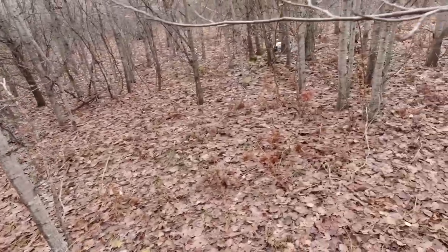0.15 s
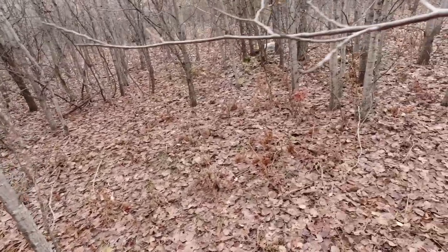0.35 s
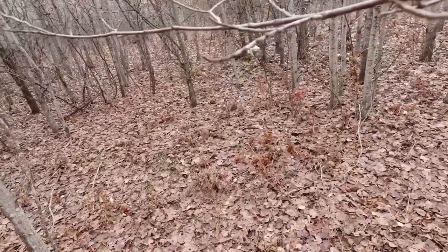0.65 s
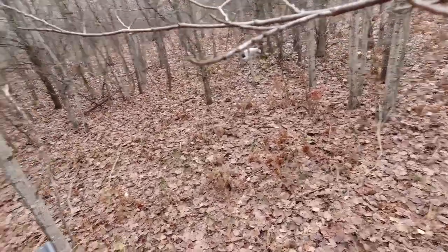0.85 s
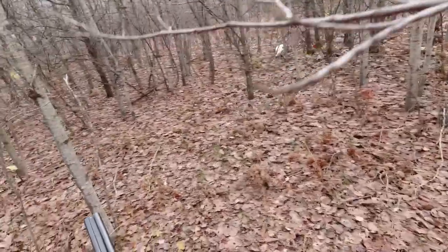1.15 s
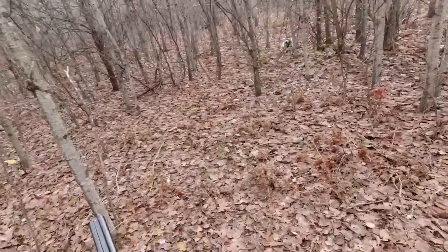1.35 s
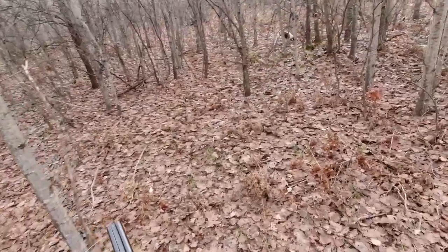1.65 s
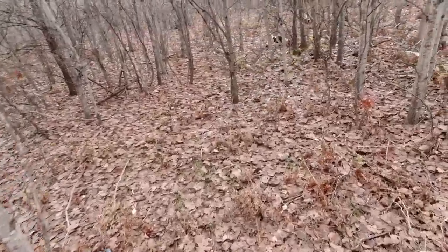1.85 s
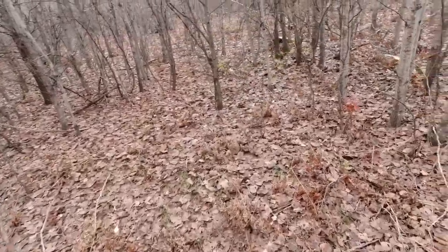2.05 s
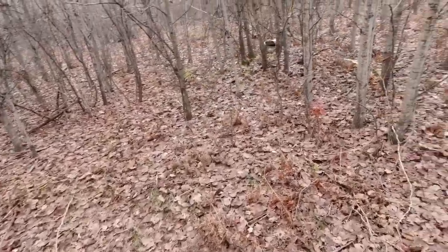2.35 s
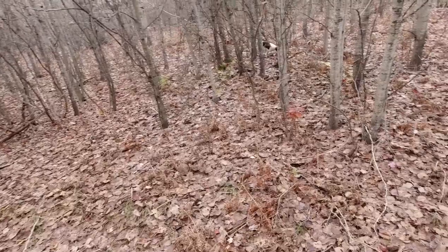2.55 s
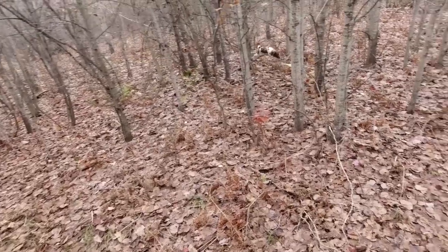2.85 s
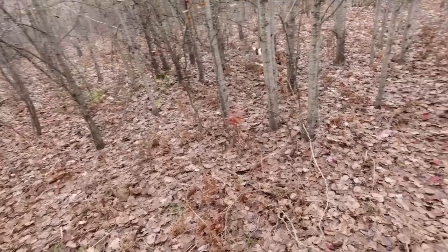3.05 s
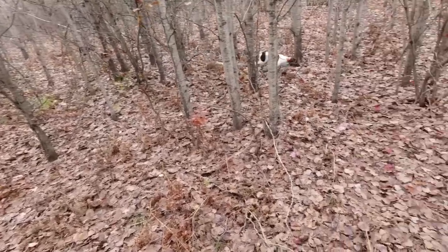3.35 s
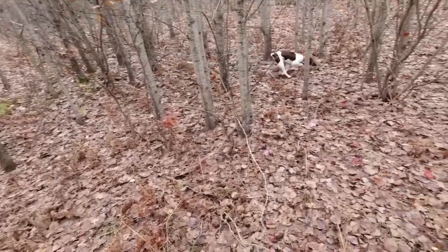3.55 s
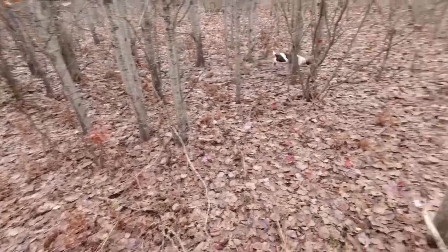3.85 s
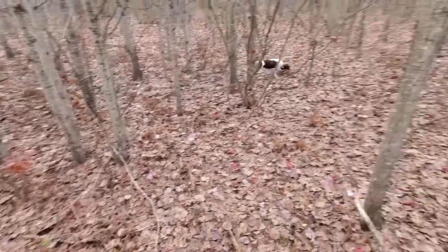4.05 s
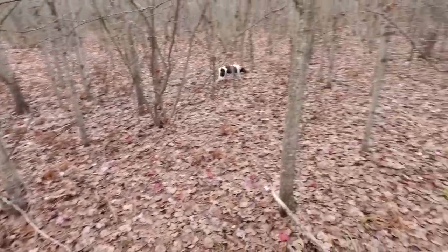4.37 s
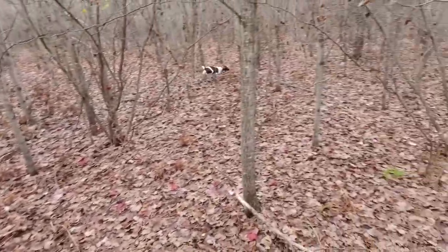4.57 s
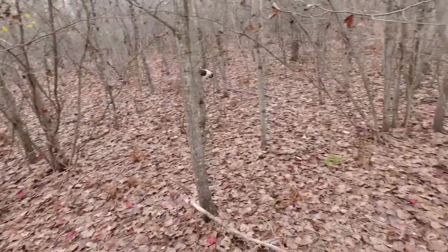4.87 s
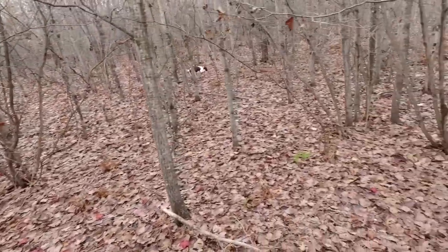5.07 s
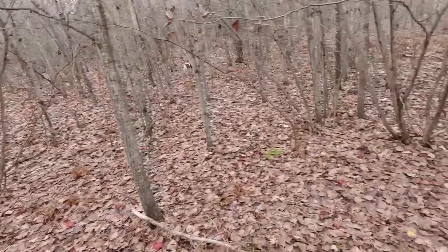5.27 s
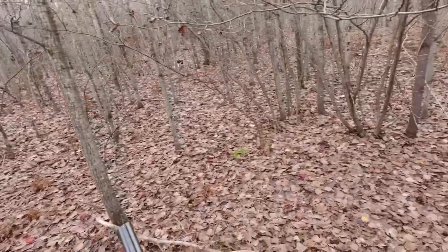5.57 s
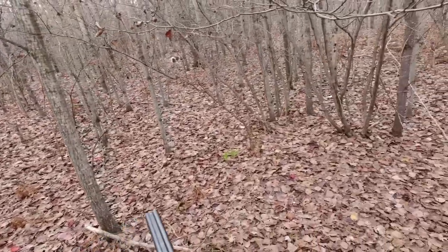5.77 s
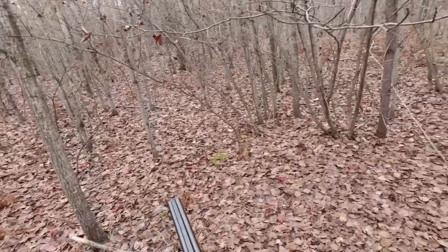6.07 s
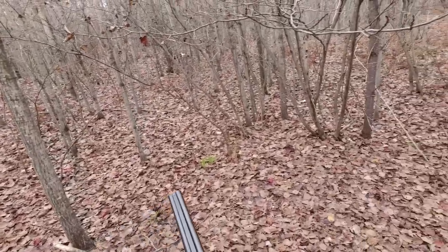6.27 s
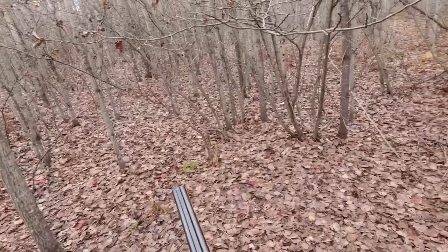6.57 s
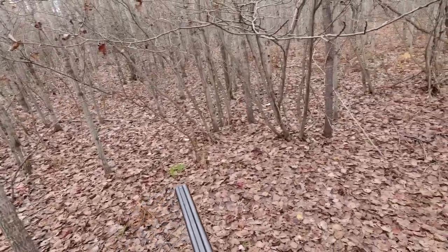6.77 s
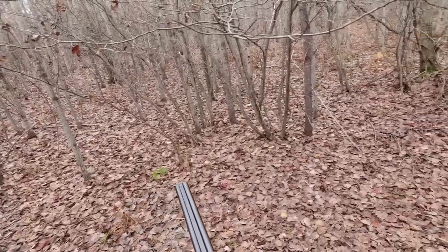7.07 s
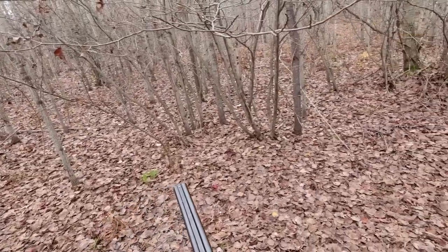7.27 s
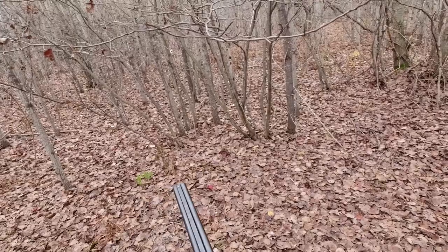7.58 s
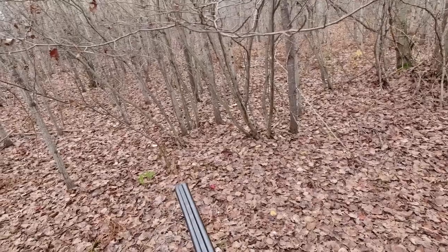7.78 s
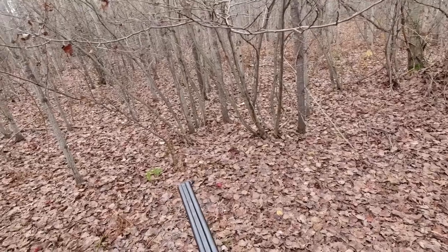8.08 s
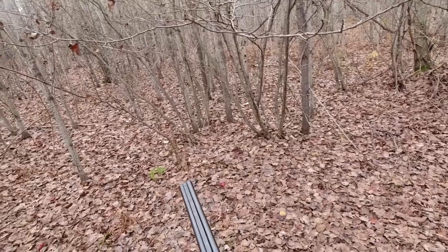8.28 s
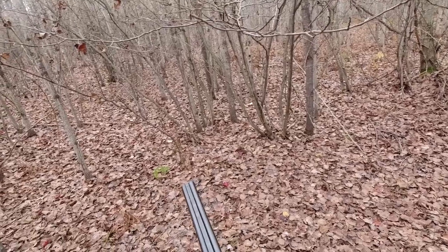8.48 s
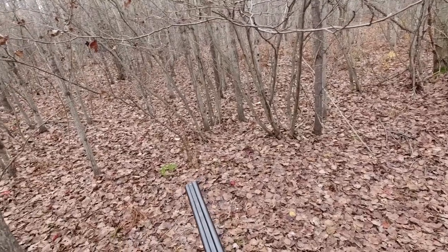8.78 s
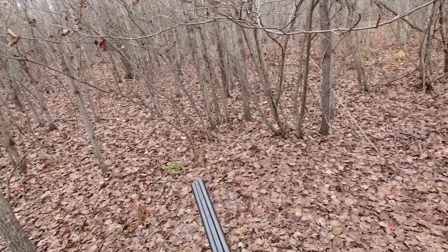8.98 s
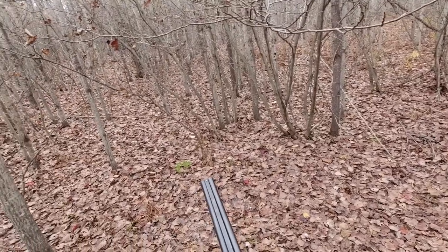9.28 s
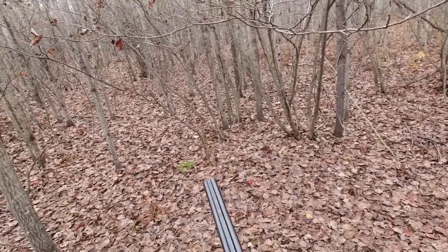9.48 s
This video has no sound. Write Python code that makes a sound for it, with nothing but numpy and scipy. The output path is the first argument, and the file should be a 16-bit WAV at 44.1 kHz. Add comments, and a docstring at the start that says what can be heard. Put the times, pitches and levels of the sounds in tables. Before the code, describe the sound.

Outdoor stereo sound from a microphone worn by someone walking in dry leaves. A distant brass dog bell tinkles unevenly, becomes quick and clear as the dog passes mid-way, then grows duller and sparser. Early on, a twig striking the microphone case gives one abrupt double crack, far louder than everything else. Soft leaf crunches, small snaps, a low hum at first and brief wind bumps surround it.

```python
"""A dog with a small brass bell on its collar hunts through dry leaves in bare woods, over still air.
At first a low rumble with a hum lasts three seconds; small twigs snap, and feet and paws rustle throughout.
At 1.4 s a twig whips across the microphone case: a shot-like double crack of pulses, with damped modes.
The bell, a sum of decaying partials choked by its clapper and scattered by the trunks, is clearest
near 3.6 s and then recedes. From 4.5 s a few bumps of wind, short swells of low noise, follow."""
import sys
import numpy as np
from scipy import signal
from scipy.fft import rfft, irfft, next_fast_len
from scipy.io import wavfile

SR = 44100
rng = np.random.default_rng(int(sys.argv[2]) if len(sys.argv) > 2 else 0)


def inscribe(sig):
    """Save sig as 16-bit PCM at rate SR to the path in sys.argv[1].

    A 1-D sig is mono; a 2-D sig holds one channel per row.
    Samples are clipped to [-1, 1] before scaling.
    """
    pcm = np.round(np.clip(np.atleast_2d(sig).T, -1, 1) * 32767)
    wavfile.write(sys.argv[1], SR, pcm.astype(np.int16))


N = 424683
TIME = np.arange(N) / SR

# Clapper strikes. Each row: start in seconds, then the levels in dB, before the balance of the families,
# of the low note, of the clang near 4 kHz and of the high shimmer.
STRIKES = [(0.3413, -43.5, -55, -60), (0.4868, -45.5, -60.5, -54.5), (0.684, -39, -52, -66),
           (1.1052, -29, -46.5, -51.5), (1.1814, -56, -53, -65), (1.291, -42, -56, -58.5),
           (1.6111, -45, -52.5, -54.5), (2.029, -52, -55, -49), (2.2393, -53, -53, -48),
           (2.379, -44, -54.5, -53.5), (2.5274, -43.5, -61, -50.5), (2.6314, -30, -46, -47),
           (2.758, -47.5, -55, -57), (2.9515, -42, -54.5, -50.5), (3.1869, -34, -43, -45.5),
           (3.2303, -35, -73, -59), (3.444, -40, -39.5, -43), (3.5052, -32, -49, -46.5),
           (3.6163, -28, -43.5, -40), (3.68, -29.5, -47.5, -60), (3.8307, -37, -43, -42),
           (3.9435, -45, -48.5, -62.5), (4.0939, -27, -39, -43), (4.2226, -30.5, -37.5, -41),
           (4.2548, -42.5, -32.5, -59), (4.3267, -29, -44.5, -47), (4.3464, -32, -54, -39),
           (4.4045, -28, -34.5, -41.5), (4.4564, -36, -50, -46), (4.5579, -28, -39, -32),
           (4.7177, -35, -46, -44.5), (4.791, -30.5, -45.5, -48), (4.8526, -31.5, -46, -48),
           (4.9923, -38.5, -44, -40), (5.1937, -49, -43, -58), (5.231, -39, -41.5, -52.5),
           (5.3484, -37.5, -41, -51.5), (5.4161, -34, -40, -57), (5.506, -37, -47, -57),
           (5.7118, -37.5, -40, -52.5), (5.9737, -34.5, -64, -69), (6.0792, -34, -43.5, -43),
           (6.3007, -38.5, -56, -57.5), (6.3861, -39.5, -41.5, -48), (6.4906, -36, -46.5, -51.5),
           (6.649, -41, -46.5, -60), (6.7854, -43, -42.5, -60.5), (6.9168, -53.5, -47.5, -51),
           (7.0795, -35.5, -44, -53.5), (7.217, -44, -48.5, -67.5), (7.414, -42, -55.5, -74.5),
           (7.5738, -34, -45.5, -53), (7.7033, -44.5, -56.5, -66), (7.869, -41, -54, -86),
           (8.1323, -38.5, -41.5, -63.5), (8.1684, -36.5, -47, -57), (8.2385, -44.5, -49, -78),
           (8.314, -39, -50, -56.5), (8.4279, -36.5, -42.5, -59.5), (8.8641, -39.5, -44, -89),
           (8.9284, -45, -53, -87), (9.123, -53, -49, -57), (9.4869, -52.5, -50, -82.5)]
# Dulling by distance and brush, least as the dog passes; each sound takes its own share of it.
# Each row: time in seconds, muffling in dB.
MUFFLING = [(0, 16), (2.4, 17.5), (3.2, 8), (3.6, -5), (4.6, 9), (5.3, 8), (6.3, 10), (7.5, 16), (9.6, 24)]
USUAL_NOTE_DB = -35.5  # low note of a strike of middling strength


def amp(db):
    """Converts level to amplitude: 20 dB is a factor of ten."""
    return 10 ** (np.asarray(db) / 20)


def unit(x):
    """Normalises the mean power to 1."""
    return x / np.sqrt(np.mean(x ** 2) + 1e-20)


def over_hz(points, hz):
    """Interpolates a spectrum linearly over the logarithm of frequency."""
    f, value = np.transpose(points)
    return np.interp(np.log(hz + 1), np.log(f + 1), value)


def over_time(rows, t, column=1):
    """Interpolates one column of a table linearly over time."""
    rows = np.asarray(rows)
    return np.interp(t, rows[:, 0], rows[:, column])


def add(mix, s, sound):
    """Superposes a stereo sound on the mix from s seconds on."""
    part = mix[:, max(round(s * SR), 0):][:, :sound.shape[1]]
    part += sound[:, :part.shape[1]]


def noise(colour, size=N, grain_db=0, grains_per_s=SR):
    """Partly coherent stereo noise of rms 1: filtered random impulses, crackling if sparse and uneven."""
    # Each row: frequency in Hz, coherence of left and right from 0 to 1.
    likeness = [(30, .72), (300, .7), (1200, .82), (2500, .6), (5000, .3), (12000, .1)]
    n = next_fast_len(size, True)
    hz = np.fft.rfftfreq(n, 1 / SR)
    grain_size = amp(grain_db * np.minimum(rng.exponential(1, n), 4))
    grains = grain_size * (rng.random(n) < grains_per_s / SR)
    mid, side = rfft(rng.standard_normal((2, n)) * grains)
    # the balance of sum and difference sets the coherence
    coherence = np.clip(over_hz(likeness, hz), 0, 1)
    mid = mid * np.sqrt(1 + coherence)
    side = side * np.sqrt(1 - coherence)
    spectrum = np.array([mid + side, mid - side]) * amp(over_hz(colour, hz))
    return unit(irfft(spectrum, n)[:, :size])


def bell(contact_db=-3, contact_s=0.0011, rebound_spread=.3, count=40):
    """Impact excitation: each strike has a contact click and a softer rebound; faint chance touches jingle."""
    rebound_s, rebound_db = 0.055, -14
    out = np.zeros((2, N))
    for s, note_db, clang_db, shimmer_db in STRIKES:
        add(out, s, strike(s, note_db, clang_db, shimmer_db))
        add(out, s, tick(shimmer_db + contact_db, contact_s))
        again = s + rebound_s * np.exp(rebound_spread * rng.standard_normal())
        add(out, again, amp(rebound_db) * strike(s, note_db, clang_db, shimmer_db))
    # A light touch of the clapper, in one row: low note, clang and unmuffled shimmer, all in dB.
    note_db, clang_db, shimmer_db = (-50, -57, -57.5)
    for k, offset in enumerate(rng.random(count)):
        s = (k + offset) * N / SR / count
        add(out, s, strike(s, note_db, clang_db, shimmer_db - over_time(MUFFLING, s)))
    return out


def strike(s, note_db, clang_db, shimmer_db, choke_db=-16, upper_choke_db=-3, choke_s=.006,
           detune=.0045, port_delay=.00002, rise_s=0.00091, buzz=.008, buzz_s=.03, buzz_step_s=.0008,
           note_spot_db=5.5, upper_spot_db=7.5):
    """Modal synthesis: partials ring freely until the clapper on the rim damps them, the lowest most."""
    # Partials of the bell. Each row: frequency in Hz, level in dB relative to its family,
    # free decay by 60 dB in seconds, number of the family.
    partials = [(1606, 0, .4, 0), (1562, -15, .09, 0), (1485, -16, .06, 0), (3838, 0, .38, 1),
                (4114, -1.5, .25, 1), (4192, -3, .35, 1), (7116, -8, .39, 2), (7230, -3, .38, 2),
                (7390, 0, .35, 2), (6020, -20, .2, 2), (8130, -15, .18, 2), (10670, 0, .34, 3),
                (10830, -2.5, .21, 3), (11380, -2, .22, 3), (11580, -3, .22, 3), (12000, -8, .12, 3),
                (14510, -2, .25, 4), (14700, 1, .3, 4)]
    # Motion of the dog. Each row: time in seconds, speed of approach in m/s.
    approach = [(0, 2), (2.6, 3), (3.6, -0.06), (4.3, -0.5), (5.4, -1.23), (6.6, 0.55), (7.6, -2.63),
                (9.6, -0.5)]
    sound_speed = 343  # m/s
    t = TIME[:SR // 5]
    hz, db, t60, family = np.transpose(partials)
    family = np.round(family).astype(int)
    spot, drift, lag, phase = rng.standard_normal((4, len(hz)))

    # each strike lands on another spot of the rim and shares its energy differently
    size = amp(db + np.where(family == 0, note_spot_db, upper_spot_db) * spot)
    size /= np.sqrt(np.bincount(family, size ** 2))[family]
    size *= amp(family_levels(s, note_db, clang_db, shimmer_db)[family])

    # Doppler shift, and a small chance detuning
    hz = hz * (1 + over_time(approach, s) / sound_speed + detune * drift)

    # free for 0.03 s at middling strength; a blow 28 dB harder brings the clapper back twice as soon
    free_s = 0.03 * 2 ** ((USUAL_NOTE_DB - note_db) / 28)
    choked = .5 + .5 * np.tanh((t - free_s) / choke_s)
    family_choke_db = np.where(family == 0, choke_db, upper_choke_db)[:, None]
    loss_db = family_choke_db * choked - 60 * t / t60[:, None]

    # the chattering clapper jitters the pitch at first, which frays the high partials most
    chatter = np.interp(t / buzz_step_s, np.arange(len(t)), rng.standard_normal(len(t)))
    clock = t + np.cumsum(buzz * chatter * np.exp(-t / buzz_s)) / SR
    angle = np.float32(2 * np.pi * (hz[:, None] * clock + phase[:, None]))
    ring = amp(np.float32(loss_db)) * (np.cos(angle) + 1j * np.sin(angle))

    # each partial meets the two microphones a little apart
    ports = size * np.exp(1j * np.pi * np.outer([1, -1], hz * lag * port_delay))
    return (ports @ ring).real * (1 - np.exp(-t / rise_s))


def family_levels(s, note_db, clang_db, shimmer_db, balance_db=(-1.2, 1.4, -6.5, -.3, -6),
                  third_muffling=0.39, top_muffling=.75):
    """Excess attenuation: of the five families' levels in dB, the third and the top fade with muffling."""
    lost_db = over_time(MUFFLING, s)
    third_db = (clang_db + shimmer_db) / 2 - third_muffling * lost_db
    top_db = shimmer_db - top_muffling * lost_db
    return np.array([note_db, clang_db, third_db, shimmer_db, top_db]) + balance_db


def tick(db, decay_s):
    """Impulsive radiation: bright, grainy noise under an exponential decay."""
    # Each row: frequency in Hz, relative spectral level in dB.
    tick_spectrum = [(300, -15.5), (1500, -1.5), (4000, 6), (7000, -5), (11000, 4), (16000, -9)]
    t = TIME[:2048]
    return amp(db) * np.exp(-t / decay_s) * noise(tick_spectrum, size=len(t), grain_db=4.5)


def woods(x, early_db=6, early_s=.03, stride_s=0.21, count=3):
    """Multiple scattering: trunks return many faint echoes, on paths that change as the dog runs."""
    # Scattering by the trunks, strongest for short waves. Each row: frequency in Hz, relative level in dB.
    scatter = [(200, -14), (1600, -3.5), (4000, -3), (8000, 1.5)]
    # Reverberation. Each row: frequency in Hz, decay by 60 dB in seconds.
    reverberation = [(200, 0.54), (1600, 0.41), (4000, 0.85), (8000, 0.55), (15000, 0.13)]
    echo_colour = [(20, 0.0084), (20000, 0.026)]  # Hz, relative dB: almost white
    t, out = TIME[:SR // 2], 0
    for k in range(count):
        taps = noise(echo_colour, size=len(t), grains_per_s=2100) * (t > .003)
        taps = taps * (1 + amp(early_db) * np.exp(-t / early_s))  # the nearest trunks return most
        hz, at, z = signal.stft(taps, SR, nperseg=256)
        z *= amp(over_hz(scatter, hz)[:, None] - 60 * at / over_hz(reverberation, hz)[:, None])
        tail = signal.istft(z, SR, nperseg=256)[1]
        # the sound passes from one set of paths to the next
        share = np.cos(np.pi * (TIME / stride_s + k) / count) * np.sqrt(2 / count)
        out = out + signal.oaconvolve(x * share, tail / np.linalg.norm(tail[0]), axes=1)[:, :N]
    return out


def twig_crack(blow_db=-1.14, ring_db=-10, port_delay=.00002):
    """Forced vibration: a twig hits and drags over the microphone case, whose damped modes ring briefly."""
    # Drag of the twig over the case. Each row: time in seconds, level in dB.
    drag = [(1.385, -62), (1.422, -47), (1.43, -36), (1.456, -35), (1.463, -18.5), (1.505, -31.5),
            (1.519, -23.5), (1.527, -32), (1.57, -73)]
    # Each row: frequency in Hz, relative spectral level in dB.
    drag_spectrum = [(200, -44), (850, -18), (1080, -34.5), (1400, -4), (1830, -5), (2900, -2), (4400, -14),
                     (5200, -14.5), (6700, -33.5), (9000, -21), (16000, -39.5)]
    # Blows of the twig. Each row: centre in seconds, peak in dB before blow_db, centre frequency in Hz,
    # contact time in seconds, level of the sharp tick in dB relative to the peak.
    blows = [(1.4284, -30, 1900, 0.00065, -5.5), (1.4628, -3.5, 1960, 0.00091, -10),
             (1.4654, -7.5, 1870, 0.00048, -26), (1.47, -12, 2654, 0.0018, -16.5),
             (1.5087, -22, 3180, 0.00049, -11.5), (1.5155, -13, 5020, .0012, -9),
             (1.52, -11, 1826, 0.0017, -5.5)]
    # Each row: frequency in Hz, relative spectral level in dB.
    blow_tick_spectrum = [(300, -30), (900, -20.5), (1700, 2.5), (5500, -0.5), (7000, -14.5), (12500, -15),
                          (16000, -21)]
    # Modes of the case. Each row: frequency in Hz, relative level in dB, decay by 60 dB in seconds.
    modes = [(1417, -14, .032), (1835, -3.5, .035), (2240, -6, .04), (2490, -3.5, .04), (2850, -2.5, .04),
             (3445, -3, .08), (4950, -7.5, .03)]

    force = amp(over_time(drag, TIME)) * noise(drag_spectrum, grain_db=-2.0)
    force *= (TIME > drag[0][0]) & (TIME < drag[-1][0])

    t = np.arange(-SR // 100, SR // 100) / SR
    ports = t + np.array([[.5], [-.5]]) * port_delay  # a blow reaches the two sides a little apart
    for s, db, hz, contact_s, tick_db in blows:
        push = np.cos(2 * np.pi * hz * ports) + amp(tick_db) * noise(blow_tick_spectrum, size=len(t))
        contact = np.exp(-.5 * (t / contact_s) ** 2)
        add(force, s + t[0], amp(blow_db + db) * contact * push)

    t = np.arange(SR // 6) / SR
    case = sum(amp(db - 60 * t / t60) * np.sin(2 * np.pi * hz * t) for hz, db, t60 in modes)
    case = case[None] / np.linalg.norm(case) / 4
    return force + amp(ring_db) * signal.oaconvolve(force, case, axes=1)[:, :N]


def snaps(level_db=-7):
    """Brittle fracture: each small twig breaks with a bright, fast-decaying tick."""
    # Each row: start in seconds, level in dB before level_db, decay constant in seconds.
    breaks = [(0.5604, -43.5, 0.019), (.924, -38, 0.0011), (0.931, -33, 0.0017), (.965, -40, .0012),
              (1.0754, -41.5, .0011), (2.093, -43, 0.0019), (3.804, -38, 0.0033)]
    out = np.zeros((2, N))
    for s, db, decay_s in breaks:
        add(out, s, tick(level_db + db, decay_s))
    return out


def leaves(crackle_db=2.5, swish_db=1, clump_db=3.5, clump_s=0.012, paws_press_s=0.0048, paws_per_note=.6):
    """Granular friction: feet and paws in litter make brittle grains in clumps, a dull swish and soft thuds."""
    # Steps in dry leaves. Each row: time of full weight in seconds, then the levels in dB of crackle
    # and swish before crackle_db and swish_db.
    steps = [(0.062, -60.5, -59), (1.68, -61, -59.5), (2.35, -63.5, -76), (2.528, -54, -55),
             (3.1, -59, -76), (3.33, -60.5, -80), (3.599, -57.5, -67), (3.73, -52.5, -59),
             (4.22, -55.5, -63.5), (4.62, -58.5, -58), (5.09, -65, -56.5), (5.4, -62, -72),
             (5.699, -83, -59.5), (5.85, -66.5, -56)]
    # Footfalls on soft soil. Each row: centre in seconds, level in dB, half-length in seconds.
    footfalls = [(2.45, -47, 0.0087), (3.76, -53, 0.021), (4.48, -61.5, 0.012)]
    # Spectra of crackle, swish and thud. Each row: frequency in Hz, relative spectral level in dB.
    crackle_spectrum = [(700, -24), (1500, -1), (3000, 4.5), (5000, -1), (6600, -11), (9000, -6.5),
                        (12000, -9), (13500, -16.5), (16000, -20.5)]
    swish_spectrum = [(70, -19), (200, -5.5), (400, 0), (900, 2.5), (1300, 2.5), (2000, -11.5), (4000, -32)]
    soil_spectrum = [(30, -35), (160, -3), (280, -5.5), (1500, -30)]
    press_s, lift_s = 0.081, 0.093  # time constants of a step's swell and decay
    paws_lift_s = 0.055
    paws_db = -57  # unmuffled, at a middling strike, before crackle_db
    stir_db = -75.5  # dull stirring between steps, before swish_db

    # the paws land as the clapper strikes
    paws = []
    for s, note_db, *_ in STRIKES:
        effort_db = paws_per_note * (note_db - USUAL_NOTE_DB)
        paws.append((s, paws_db + effort_db - over_time(MUFFLING, s)))

    step_crackle = treads([(s, db) for s, db, _ in steps], press_s, lift_s)
    crackle = np.hypot(step_crackle, treads(paws, paws_press_s, paws_lift_s))
    swish = amp(stir_db) + treads([(s, db) for s, _, db in steps], press_s, lift_s)
    clumps = clump_db * np.interp(TIME / clump_s, np.arange(N), rng.standard_normal(N))
    brittle = crackle * amp(crackle_db + clumps) * noise(crackle_spectrum, grain_db=3.0, grains_per_s=8300)
    dull = swish * amp(swish_db + .5 * clumps) * noise(swish_spectrum, grain_db=0.5, grains_per_s=3000)
    thuds = swells(footfalls) * noise(soil_spectrum)
    return brittle + dull + thuds


def treads(rows, press_s, lift_s):
    """Addition of powers: the gain of treads (s, dB) that swell as weight comes down and die as it lifts."""
    t = np.arange(-SR // 2, SR // 2) / SR
    power = np.zeros((1, N + SR))  # starts half a second early
    shape = np.exp(-np.maximum(-t / press_s, t / lift_s))[None]
    for s, db in rows:
        add(power, s, (amp(db) * shape) ** 2)
    return np.sqrt(power[0, SR // 2:][:N])


def background(air_db=-66.5, hum_db=-10.0):
    """Stationary and gated noise: still air, a humming rumble that stops short, and wind at the microphone."""
    # Spectra of air, rumble, hum and wind. Each row: frequency in Hz, relative spectral level in dB.
    air_spectrum = [(15, -1), (50, 0.5), (140, -10.5), (350, -10.5), (600, -12), (1100, -23.5),
                    (3200, -19.5), (6300, -32), (10000, -30.5), (16000, -39)]
    rumble_spectrum = [(15, 3.5), (30, -0.5), (65, -3), (110, -14), (200, -16.5), (400, -20.5), (1000, -26),
                       (4000, -41), (15000, -52.5)]
    hum_spectrum = [(215, -42), (235, -6.5), (242, 0), (249, -9), (270, -41)]
    wind_spectrum = [(15, -1.5), (40, -2), (70, -2), (110, -17), (250, -44.5), (1000, -68)]
    # Each row: time in seconds, level of the rumble in dB; the hum lies hum_db from it.
    rumble_level = [(0, -56.5), (1.6, -53.5), (2.2, -57.5), (3.0, -54), (3.06, -88), (3.2, -120)]
    # Bumps of wind. Each row: centre in seconds, level in dB, half-length in seconds.
    bumps = [(4.522, -41, 0.012), (4.64, -48, 0.022), (4.72, -52, 0.038), (5.3, -63, 0.065),
             (5.51, -62, .025)]
    air = amp(air_db) * noise(air_spectrum)
    humming = noise(rumble_spectrum) + amp(hum_db) * noise(hum_spectrum)
    rumble = amp(over_time(rumble_level, TIME)) * humming
    wind = swells(bumps) * noise(wind_spectrum)
    return air + rumble + wind


def swells(rows):
    """Amplitude modulation: a gain curve of short Gaussian swells."""
    return sum(amp(db) * np.exp(-.5 * np.minimum(((TIME - s) / half_s) ** 2, 100)) for s, db, half_s in rows)


def scene(woods_db=0.5):
    """Superposition: the distant bell with its echoes, and all other sounds dry."""
    ringing = bell()
    echoes = amp(woods_db) * woods(ringing)
    return ringing + echoes + twig_crack() + snaps() + leaves() + background()


def record(dry):
    """Peak clipping at full scale, then a linear-phase low-pass at 15.9 kHz."""
    low_pass = signal.firwin(511, 15900, window=("kaiser", 9), fs=SR)
    return signal.oaconvolve(np.clip(dry, -1, 1), low_pass[None], "same")


dry = scene()
out = record(dry)
inscribe(out)
```